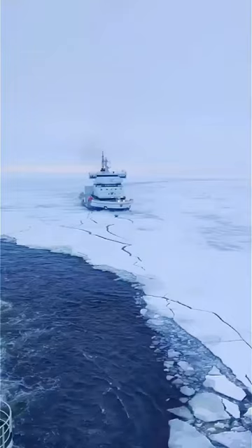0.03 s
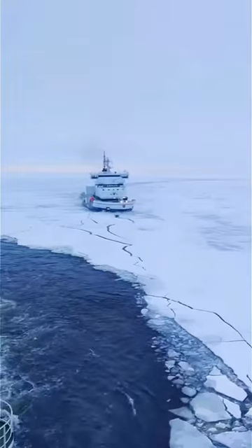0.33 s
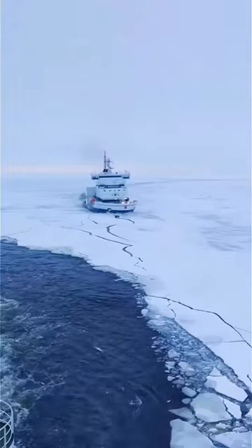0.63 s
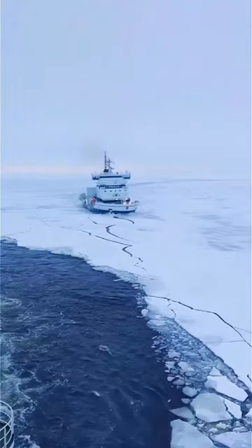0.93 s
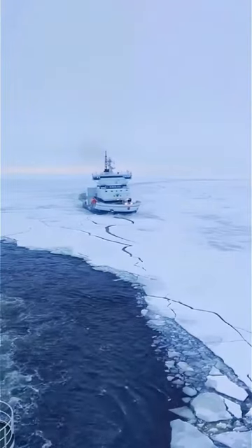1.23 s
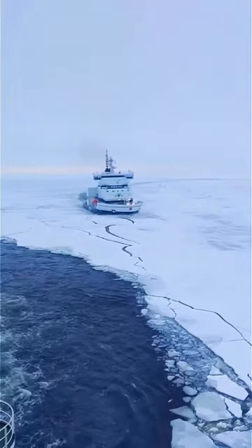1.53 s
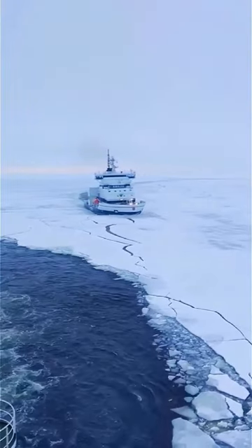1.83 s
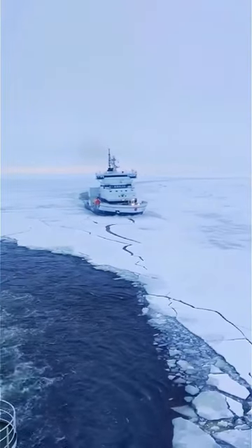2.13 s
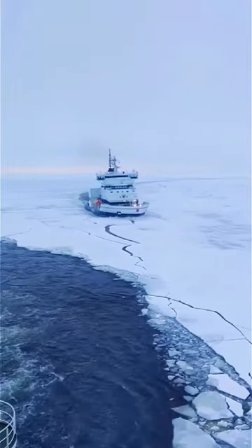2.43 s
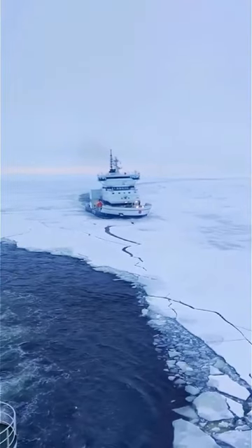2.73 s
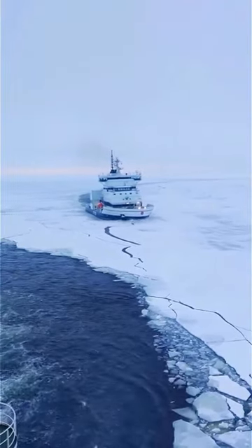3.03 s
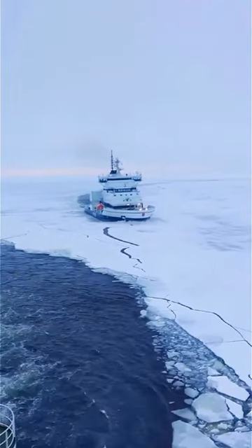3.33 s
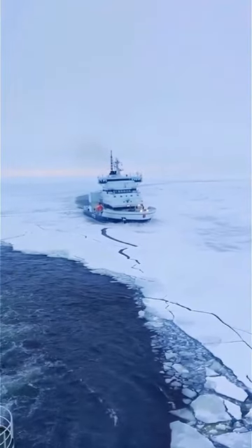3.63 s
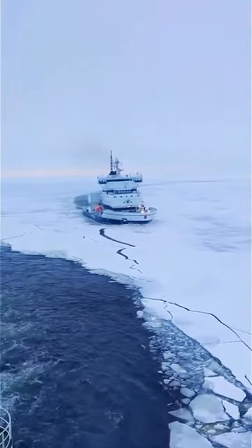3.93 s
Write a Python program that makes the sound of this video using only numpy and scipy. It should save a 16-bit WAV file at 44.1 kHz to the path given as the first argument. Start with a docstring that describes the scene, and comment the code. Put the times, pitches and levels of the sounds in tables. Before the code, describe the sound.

A ship's engine rumble and churning wake fade in within the first 0.3 seconds and continue to the end at 4 seconds. The rumble throbs on the left, under a machinery roar and thin, wavering fan whines. Foam fizzes in surges. Waves slap dully against ice around 0.4, 1.3 and faintly 2.8 seconds. Short bursts of spray hiss near 1.4, 2, 2.9 and 3.4 seconds, strongest at 2.

```python
"""Ship's stern in sea ice

A ship is under way in wind. Its engine rumbles and hums, its machinery roars through the
ringing deck, and fans and turbines whine. Behind it the wake churns and its foam fizzes up
in surges. Now and then a wave slaps the ice or breaks into spray. The sound fades in."""
import sys
import numpy as np
from scipy import signal
from scipy.fft import rfft, irfft
from scipy.io import wavfile
from scipy.ndimage import uniform_filter1d

SR = 44100
rng = np.random.default_rng(int(sys.argv[2]) if len(sys.argv) > 2 else 0)


def generate_wav(signal):
    """Clip the signal to [-1, 1] and save it as 16-bit WAV at the path in sys.argv[1]."""
    frames = np.transpose(np.atleast_2d(signal))
    scaled = np.clip(frames, -1, 1) * 32767
    pcm = np.round(scaled).astype(np.int16)
    wavfile.write(sys.argv[1], SR, pcm)


N = 176400
TIME, HZ = np.arange(N) / SR, np.fft.rfftfreq(N, 1 / SR)


def gain(db):
    """Turns decibels into a number to multiply a sound by."""
    return 10 ** (np.asarray(db) / 20)


def over_time(points):
    """Joins the points of a time table with straight lines."""
    return np.interp(TIME, *np.transpose(points))


def over_frequency(points):
    """Joins the points of a frequency table, giving each octave equal room."""
    hz, value = np.transpose(points)
    return np.interp(np.log(HZ + 1), np.log(hz + 1), value)


def resonance_db(resonances):
    """How much a set of peaks and dips raises or lowers each frequency."""
    return sum(db / (1 + (2 * (HZ - hz) / width) ** 2) for hz, width, db in resonances)


def lean_db(points):
    """Splits a right-minus-left table evenly between the two sides."""
    return np.array([[-.5], [.5]]) * over_frequency(points)


def shape_tone(noise, db_per_hz):
    """Filters white noise so that each frequency has the given strength."""
    return irfft(rfft(noise) * gain(db_per_hz) * np.sqrt(SR / 2), N)


def drift(rate_hz):
    """A smooth random wobble, about 1 in size, up to roughly the given rate."""
    keep_slow = np.exp(-(HZ / rate_hz) ** 2) * (HZ > 0)
    wobble = irfft(rfft(rng.standard_normal(N)) * keep_slow, N)
    return wobble / wobble.std()


def patchy_noise(depth_db, bands, frames):
    """Stereo noise in which patches, so many bands wide and frames long, swell and sink at random."""
    grid = signal.stft(rng.standard_normal((2, N)), nperseg=512, noverlap=384)[2]
    patches = uniform_filter1d(rng.standard_normal(grid.shape[1:]), bands, axis=0)
    patches = uniform_filter1d(patches, frames, axis=1)
    level = gain(depth_db * patches / patches.std())
    level /= np.sqrt(np.mean(level ** 2))
    return signal.istft(grid * level, nperseg=512, noverlap=384)[1][..., :N]


# How the rumble throbs (time [s], level [dB])
RUMBLE_THROB = [(.28, -3.5), (.48, 2), (.68, -2.5), (.79, 1), (1.15, -1), (1.34, 3.5), (1.45, -2),
                (1.6, -0.5), (2.2, -0.9), (2.73, -2.9), (2.85, 4), (2.97, -2.5), (3.06, 3), (3.19, -0.5),
                (3.3, 0.5), (3.5, -0.5), (3.78, -0.5), (4, 0)]
# The rumble's tone, from low to high (frequency [Hz], strength [dB per Hz])
RUMBLE_TONE = [(20, -66), (40, -62), (60, -57), (80, -46), (140, -42.5), (210, -43.5), (250, -42.5),
               (300, -58.5), (400, -55.5), (900, -100)]
# Booming peaks and dips in that tone (frequency [Hz], width [Hz], boost [dB])
RUMBLE_BOOMS = [(79, 6, 3), (93, 12, -2.5), (109, 18, 8), (123, 5, 4), (146, 18, -3), (174, 32, 5.5)]


def engine_rumble(lumpy_db=-0.2, right_db=-29.5):
    """The engine's low, lumpy booming, almost all on the left."""
    level = gain(over_time(RUMBLE_THROB) + lumpy_db * drift(27))
    tone = over_frequency(RUMBLE_TONE) + resonance_db(RUMBLE_BOOMS)
    return shape_tone(rng.standard_normal((2, N)) * level, tone) * gain([[0], [right_db]])


# The notes in the hum (pitch [times the firing rate], left level [dB], right level [dB])
HUM_NOTES = [(1, -29.5, -57), (3, -45, -41), (4, -42.5, -37.5), (4.1, -38.5, -40.5), (4.55, -42.5, -42.5)]


def engine_hum(firing_hz=108.4, wander_hz=0.687, waver_db=2, ease_db_per_s=1.0):
    """The engine's firing note and its overtones, with other machines droning; all slowly ease off."""
    out = np.zeros((2, N))
    rate_hz = firing_hz + wander_hz * drift(4)
    for multiple, left_db, right_db in HUM_NOTES:
        cycles = np.cumsum(multiple * rate_hz) / SR + rng.random()
        note = np.sqrt(2) * np.sin(2 * np.pi * cycles)
        change_db = waver_db * drift(5.3) - ease_db_per_s * TIME
        out += note * gain([[left_db], [right_db]]) * gain(change_db)
    return out


# How the roar slowly swells (time [s], level [dB])
ROAR_SWELL = [(.3, -0.4), (.63, 1), (.74, -0.5), (.87, 2.5), (1.06, 0), (1.17, 1.5), (1.27, -3), (1.42, 0),
              (1.65, 0.5), (1.8, -0.7), (2.06, -1), (2.21, 1), (2.35, 0), (2.85, -0.8), (2.97, -2),
              (3.35, -0.7), (3.57, 0.7), (3.75, -0.5), (4, 0)]
# The roar's tone (frequency [Hz], strength [dB per Hz])
ROAR_TONE = [(150, -88), (220, -77), (270, -53.5), (380, -51.5), (480, -49), (570, -56), (700, -54),
             (850, -63), (1100, -62), (1500, -67), (1900, -83.5), (4000, -100)]
# Where the deck rings (frequency [Hz], width [Hz], boost [dB])
DECK_RESONANCES = [(275, 14, 4), (326, 16, 4.5), (441, 22, 2.5), (495, 18, 3.5), (615, 30, 3),
                   (692, 24, 4.5), (805, 30, 2.5), (965, 45, 6), (1125, 50, 3.5)]
# How far the roar leans to the right (frequency [Hz], right minus left [dB])
ROAR_BALANCE = [(200, 2), (330, 4.5), (390, 7.5), (460, -1), (620, 1), (900, 5)]


def machinery_roar(flutter_db=0.37):
    """Machinery noise makes the deck ring; the same noise reaches both sides."""
    level = gain(over_time(ROAR_SWELL) + flutter_db * drift(50))
    tone = over_frequency(ROAR_TONE) + resonance_db(DECK_RESONANCES) + lean_db(ROAR_BALANCE)
    return shape_tone(rng.standard_normal(N) * level, tone)


# The whining notes (pitch [Hz], pitch wander [Hz], left level [dB], right level [dB])
WHINE_NOTES = [(710.3, .8, -39.5, -35.5), (803.5, .8, -50.5, -52), (1763, 2, -49.5, -47),
               (1836.7, 1.5, -49, -47), (2278, 12, -47.5, -48), (2602, .8, -39, -52),
               (3223.7, 1.5, -49, -56), (3976, 6, -61, -54.5)]


def fan_and_turbine_whines(waver_db=2.1, sway_radians=.15, out_of_step_above_hz=1500):
    """Fans and turbines sing thin, wavering notes; the higher ones reach the two sides out of step."""
    out = np.zeros((2, N))
    for hz, wander_hz, left_db, right_db in WHINE_NOTES:
        cycles = np.cumsum(hz + wander_hz * drift(16)) / SR
        for side, db in enumerate((left_db, right_db)):
            offset = side * np.pi / 2 * (hz > out_of_step_above_hz)  # a quarter cycle on the right
            level = np.sqrt(2) * gain(db + waver_db * drift(3.8))
            out[side] += level * np.sin(2 * np.pi * cycles + offset + sway_radians * drift(3))
    return out


# How the churning water heaves (time [s], level [dB])
CHURN_HEAVE = [(.3, 0), (.45, 0), (.68, 0.9), (.95, 1.5), (1.05, -0.5), (1.25, 0), (1.38, 4.5), (1.5, 1),
               (1.84, -1), (1.96, 2.5), (2.08, 0.5), (2.24, 2.5), (2.37, -1), (2.47, 2), (2.65, -1.1),
               (3.0, 1.5), (3.37, 0.5), (3.47, 1.5), (3.6, -0.3), (4, 0.5)]
# The water's tone (frequency [Hz], strength [dB per Hz])
CHURN_TONE = [(20, -70), (70, -66), (130, -64), (210, -56.5), (300, -60), (450, -62.5), (700, -58.5),
              (1100, -58.5), (1600, -58), (2200, -62), (2450, -64), (3000, -64), (3500, -66.5), (3660, -73),
              (4200, -75), (4450, -82.5), (6500, -91.5), (12000, -110)]
# How far it leans to the right (frequency [Hz], right minus left [dB])
CHURN_BALANCE = [(200, -1), (1400, -0.5), (1900, 1.5), (3400, 3), (4200, 2.5)]


def churning_wake(flicker_db=.5):
    """Water churns behind the ship in a broad rush, with its own noise on each side."""
    rush = patchy_noise(depth_db=2, bands=4, frames=12)
    level = gain(over_time(CHURN_HEAVE) + flicker_db * drift(35))
    return shape_tone(rush * level, over_frequency(CHURN_TONE) + lean_db(CHURN_BALANCE))


# How the foam's high fizz surges with the wake (time [s], level [dB])
FOAM_SURGES = [(.22, -3.5), (.32, 4), (.41, -3), (.5, 3.5), (.62, 2), (.72, -4.5), (.87, 2), (1.01, -1.5),
               (1.13, 4.5), (1.23, -4), (1.29, 6), (1.42, 1.5), (1.5, -3.5), (1.62, 1), (1.75, -6),
               (1.93, 3), (1.995, 7), (2.06, -0.5), (2.23, 1), (2.34, -4), (2.84, -2.5), (2.92, 2),
               (3.12, 0.2), (3.37, -2.5), (3.45, 1.5), (3.55, -2), (3.69, -2), (3.8, 3.5), (3.92, -1.5),
               (4, 0.5)]
# The foam's tone (frequency [Hz], strength [dB per Hz])
FOAM_TONE = [(400, -109), (1500, -70.5), (3300, -68.5), (4500, -75), (5600, -77), (6300, -80),
             (7700, -81.5), (8700, -79), (11300, -79.5), (12400, -81), (13100, -97)]


def fizzing_foam(splashes_per_s=490, splash_db=-12, spread_db=1.5, flicker_db=.5,
                 fizz_above_hz=7800, wash_surge_share=0.56):
    """Bursting bubbles and tiny splashes; the high fizz surges more than the lower wash."""
    size_db = spread_db * np.minimum(rng.exponential(1, (2, N)), 4)
    splashes = rng.standard_normal((2, N)) * gain(size_db)
    splashes *= rng.random((2, N)) < splashes_per_s / SR  # keep only scattered ticks
    bubbles = patchy_noise(depth_db=4.0, bands=3, frames=14)
    foam = bubbles + gain(splash_db) * splashes / splashes.std()
    foam *= gain(flicker_db * drift(40))
    surge_db = over_time(FOAM_SURGES)
    treble = 1 / (1 + (fizz_above_hz / (HZ + 1)) ** 8)  # 0 for low sounds, 1 for high ones
    fizz = treble * rfft(foam * gain(surge_db))
    wash = (1 - treble) * rfft(foam * gain(wash_surge_share * surge_db))
    return shape_tone(irfft(fizz + wash, N), over_frequency(FOAM_TONE))


# Heavy slaps of water on ice (start [s], length [s], level [dB])
SLAP_HITS = [(.335, 0.061, -6), (0.448, 0.051, -6), (1.321, 0.049, 0.3), (2.835, 0.049, -11)]
# The slaps' tone (frequency [Hz], strength [dB per Hz])
SLAP_TONE = [(50, -74), (130, -57), (300, -45), (550, -47.5), (900, -49), (1300, -68), (3000, -72),
             (8000, -100)]


def wave_slaps():
    """Each wave that hits the ice makes a short, dull burst of noise."""
    level = np.zeros(N)
    for start, length, db in SLAP_HITS:
        progress = np.clip((TIME - start) / length, 0, 1)
        level += gain(db) * np.sin(np.pi * progress)
    return shape_tone(rng.standard_normal(N) * level, over_frequency(SLAP_TONE))


# Bursts of spray (start [s], fading time [s], level [dB])
SPRAY_BURSTS = [(1.29, .04, -6), (1.39, .035, -1), (1.95, 0.035, 6), (2.9, .06, -4.5), (3.44, 0.037, -3),
                (3.78, 0.037, -8)]
# The spray's tone (frequency [Hz], strength [dB per Hz])
SPRAY_TONE = [(800, -85), (1800, -69.5), (3300, -68.5), (4300, -68), (5500, -74), (7500, -77), (11500, -78),
              (13100, -90)]


def sea_spray(rise_s=0.009, drops_per_s=1400, mist_db=-3):
    """Wave crests break into showers of drops and mist that start quickly and die away."""
    level = np.zeros(N)
    for start, fade_s, db in SPRAY_BURSTS:
        rise = np.clip((TIME - start) / rise_s, 0, 1)
        fall = np.exp(-np.maximum(TIME - start - rise_s, 0) / fade_s)
        level += gain(db) * rise * fall
    drops = rng.standard_normal((2, N)) * (rng.random((2, N)) < drops_per_s / SR)
    mist = gain(mist_db) * rng.standard_normal((2, N))
    return shape_tone(level * (drops / drops.std() + mist), over_frequency(SPRAY_TONE))


def scene():
    """The ship and the water, heard together."""
    ship = engine_rumble() + engine_hum() + machinery_roar() + fan_and_turbine_whines()
    water = churning_wake() + fizzing_foam() + wave_slaps() + sea_spray()
    return ship + water


# The opening fade (time [s], volume [0 to 1])
FADE_IN = [(.137, 0), (.139, .16), (.17, .33), (.205, .78), (.28, 1)]


def record(dry, ceiling=.8, cutoff_hz=13100):
    """Fades the sound in, gently rounds off its loudest peaks and removes the highest treble."""
    faded = dry * over_time(FADE_IN)
    rounded = faded / (1 + (faded / ceiling) ** 6) ** (1 / 6)
    treble_cut = signal.firwin(511, cutoff_hz, window=("kaiser", 9), fs=SR)
    return signal.oaconvolve(rounded, treble_cut[None], "same")


dry = scene()
out = record(dry)
generate_wav(out)
```